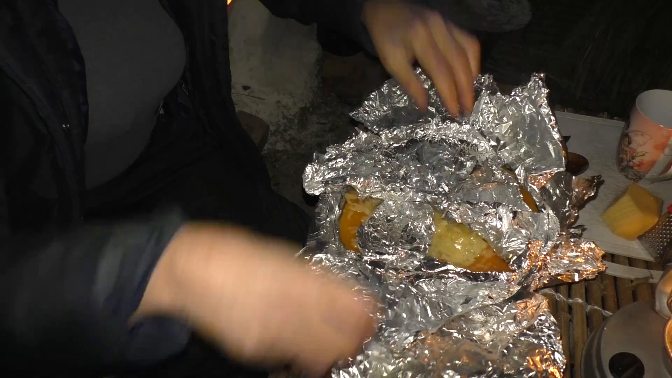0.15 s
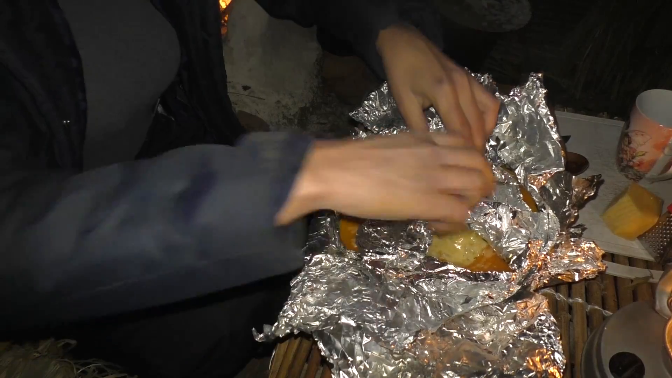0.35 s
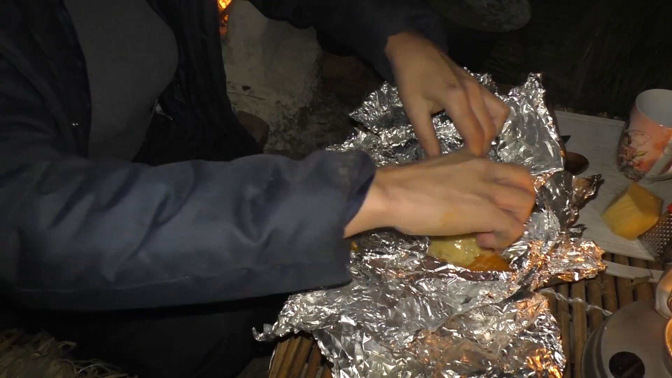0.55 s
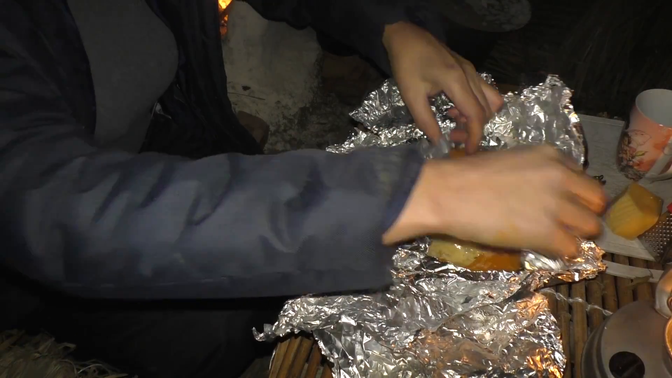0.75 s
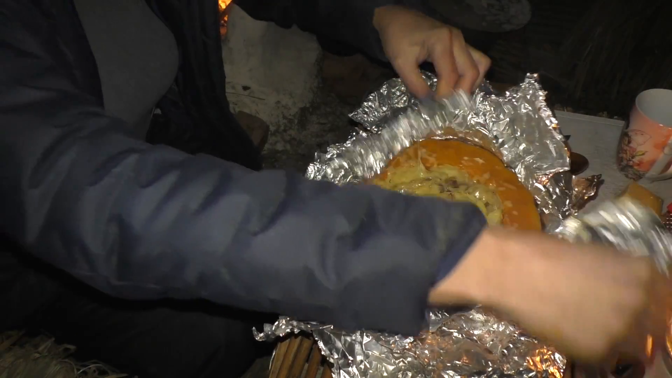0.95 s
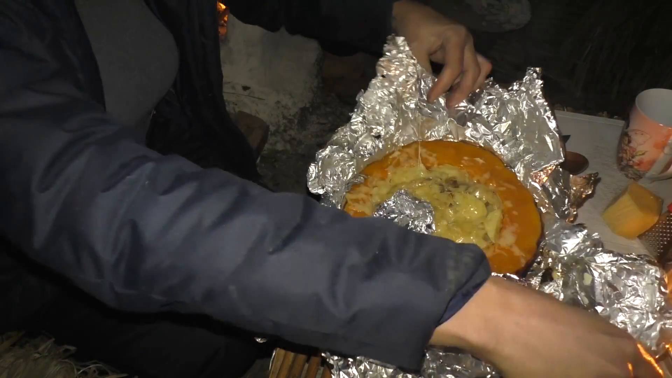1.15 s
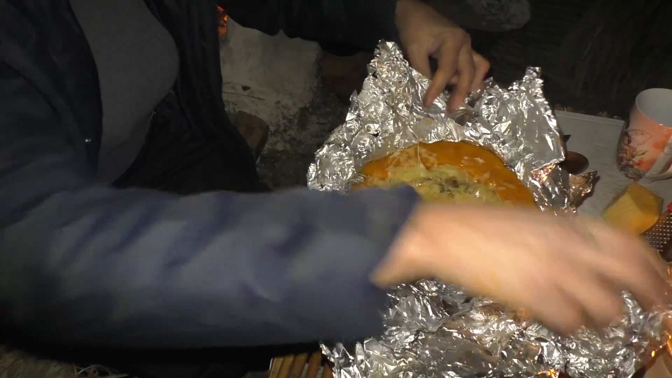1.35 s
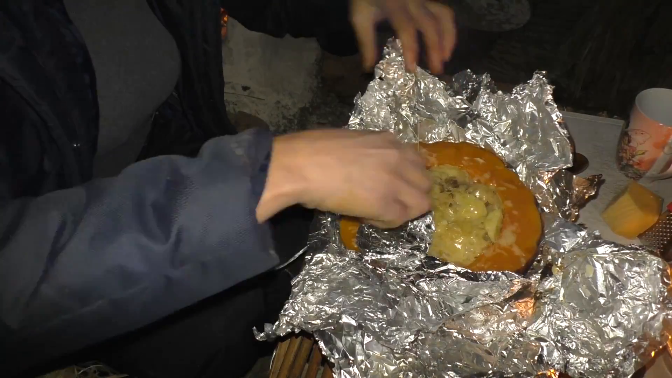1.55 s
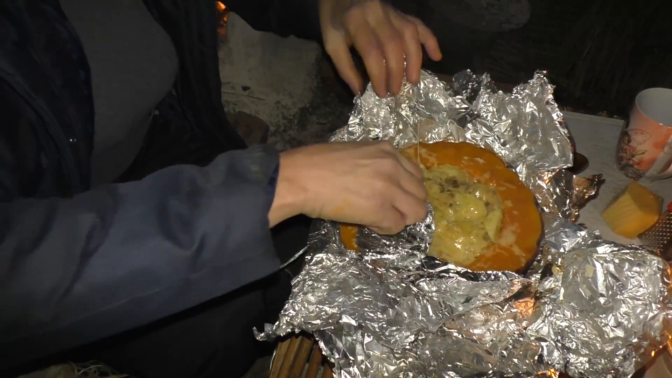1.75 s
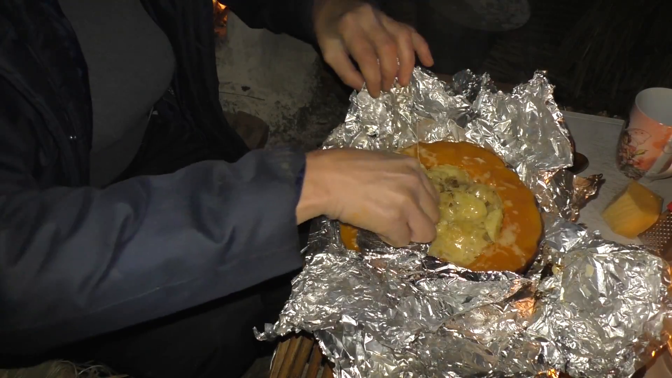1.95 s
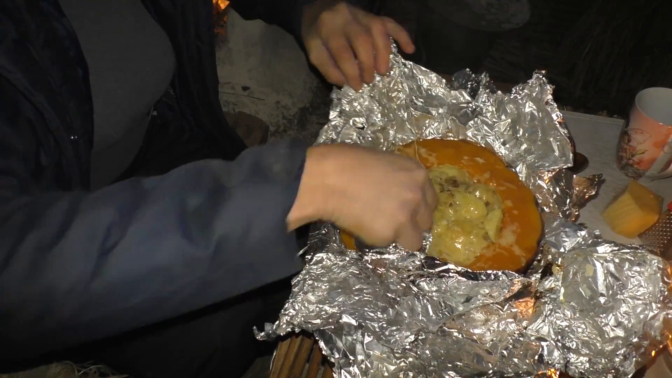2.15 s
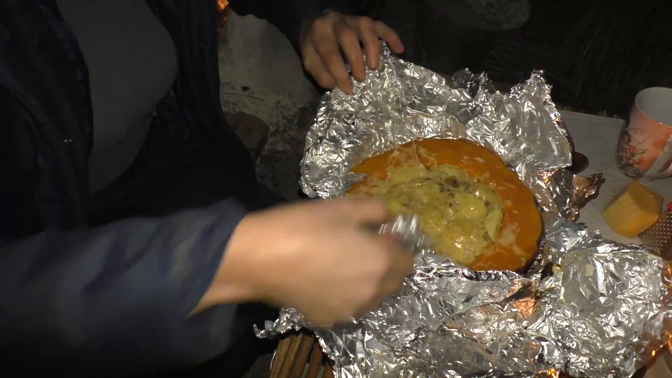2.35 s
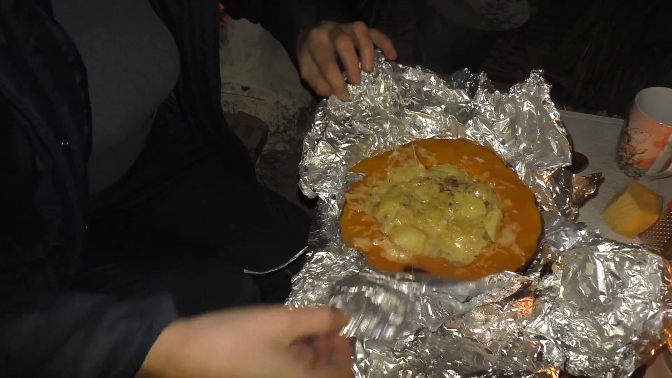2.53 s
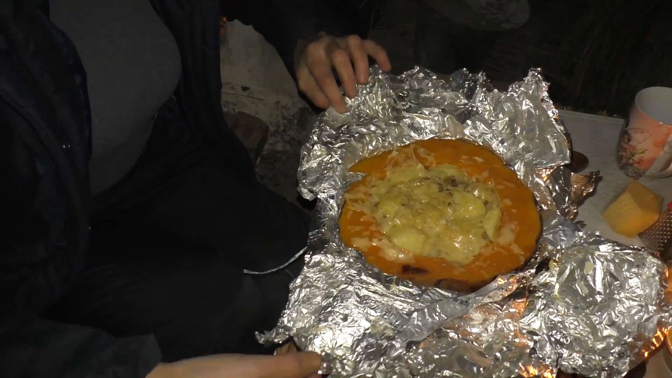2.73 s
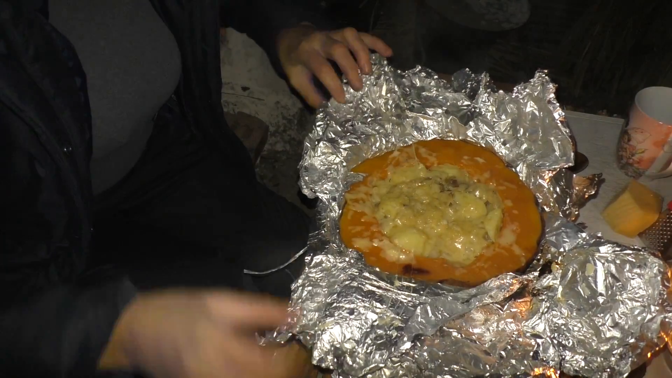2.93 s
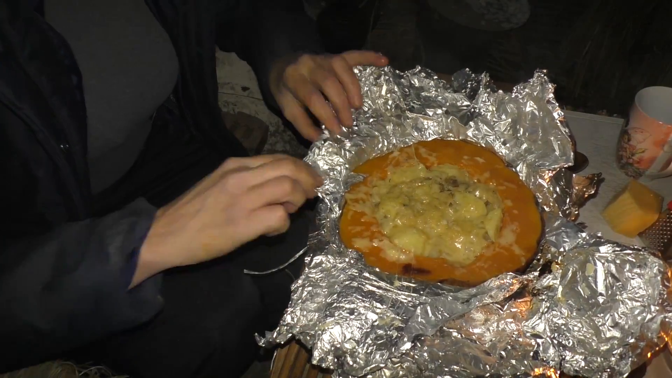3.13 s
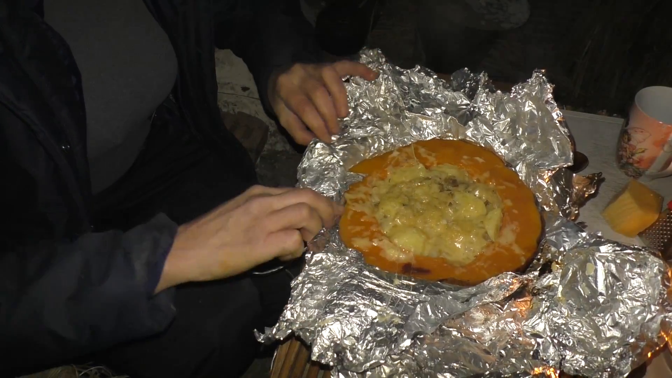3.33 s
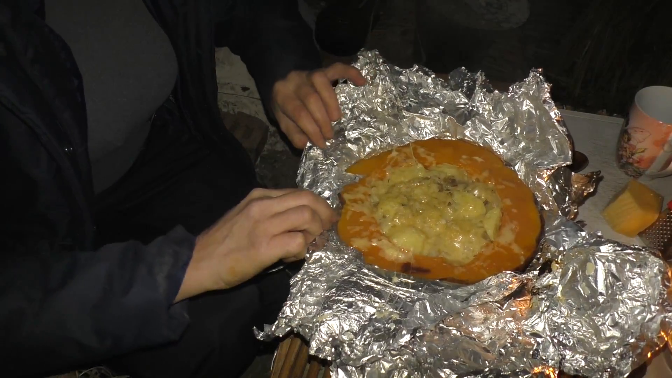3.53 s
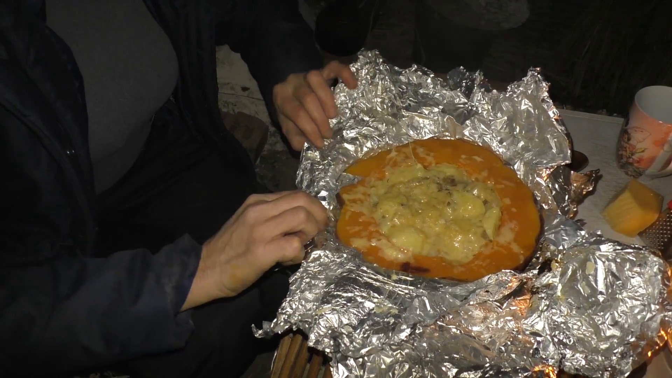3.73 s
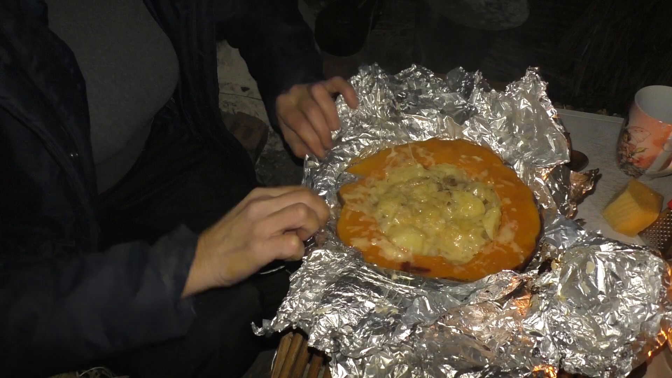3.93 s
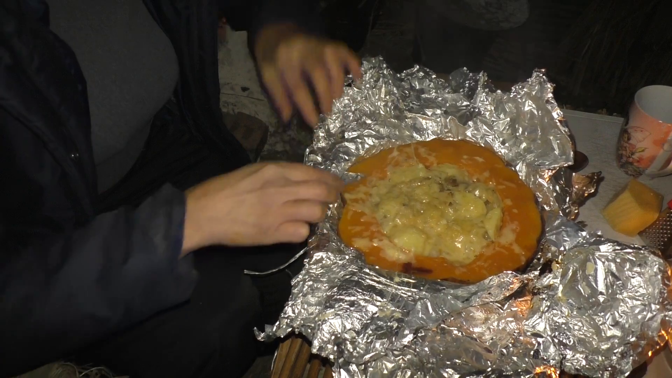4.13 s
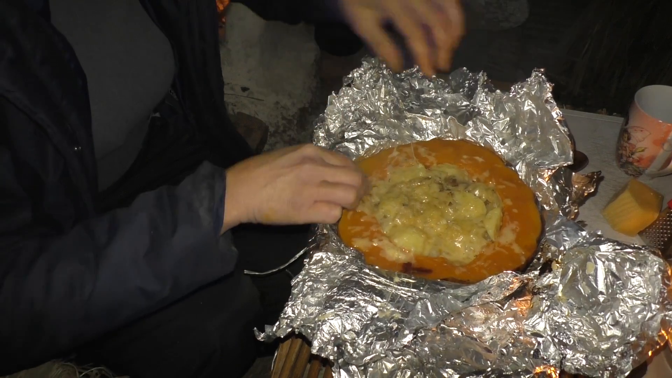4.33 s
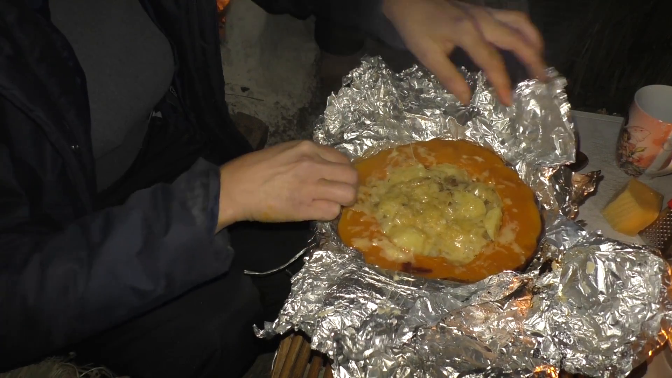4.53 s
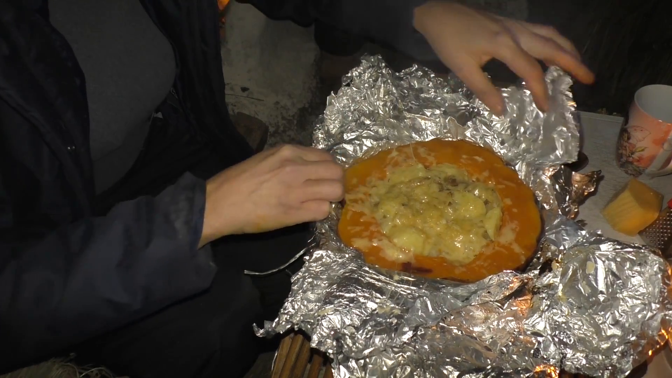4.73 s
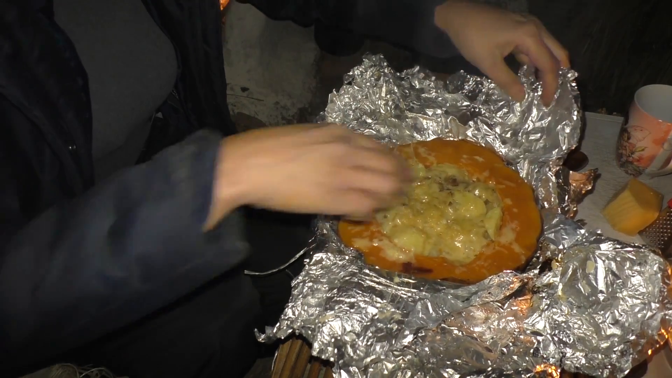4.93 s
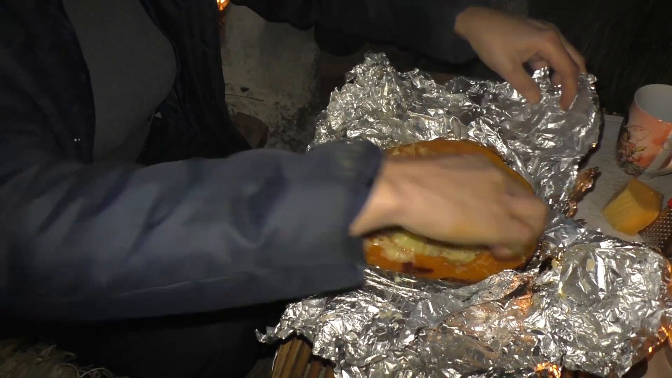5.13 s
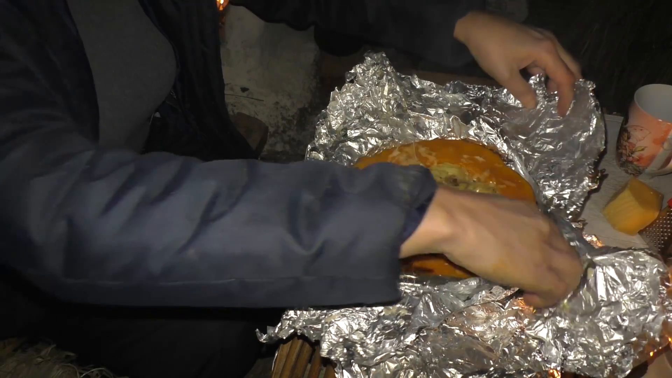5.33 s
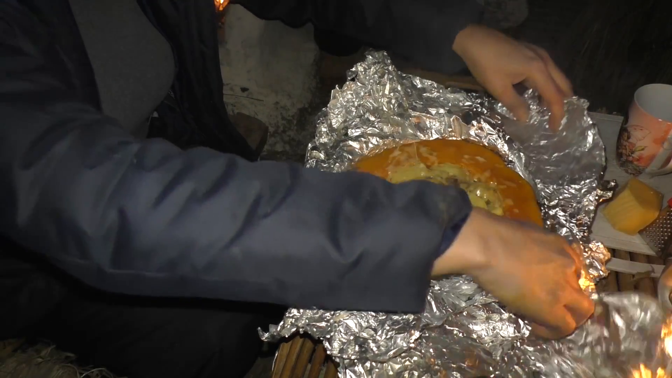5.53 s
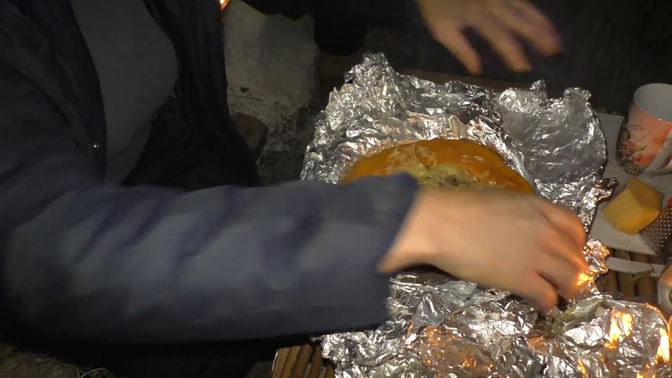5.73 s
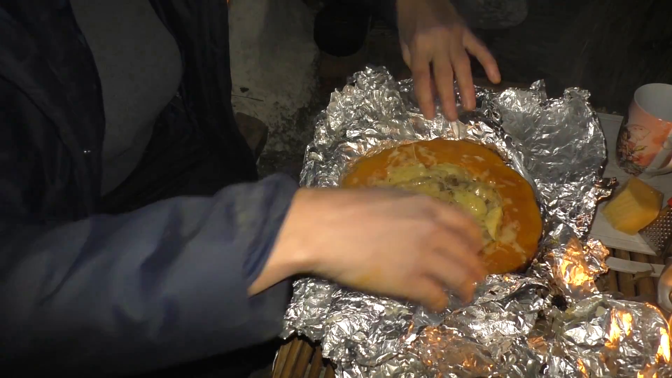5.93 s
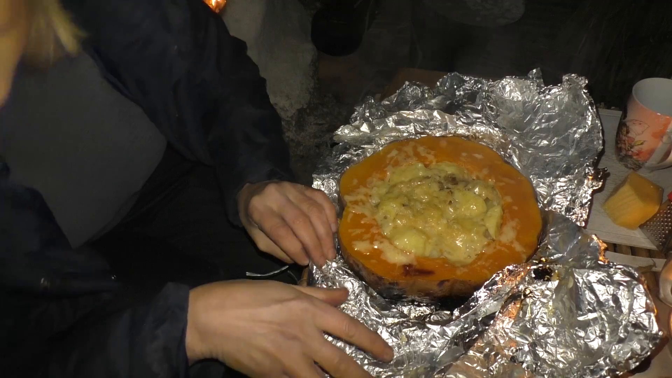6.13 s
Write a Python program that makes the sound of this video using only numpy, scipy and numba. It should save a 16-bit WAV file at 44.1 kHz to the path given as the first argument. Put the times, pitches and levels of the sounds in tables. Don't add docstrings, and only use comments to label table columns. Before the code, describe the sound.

Close stereo view of hands working on crumpled aluminium foil in a small sheltered corner. It opens mid-action with loud, bright crackling for about 0.2 s, then drops to thin rustle and scattered ticks. From about 0.9 to 1.3 s the sheet is pulled back in a dense, forceful burst of hard snaps and crinkling, with another heavy buckle near 1.6 s. A quiet gap follows until about 2.2 s, then crisp cracks and short rustles gather at 2.4 to 3.0 s. From 3.2 to 4.2 s come small, irregular folding crinkles and clear snaps; 4.2 to 5.2 s is sparser. A loud crunching flurry runs from 5.3 to 5.7 s, then light crackles to the end near 6.4 s. Soft low bumps from knuckles and sleeves recur. A brief diffuse tail, lumpy low rumble and faint hiss lie beneath.

```python
import sys
import numpy as np
from scipy import signal
from scipy.fft import rfft, irfft, next_fast_len
from scipy.io import wavfile
from scipy.ndimage import uniform_filter1d
from numba import njit

SR = 44100
rng = np.random.default_rng(int(sys.argv[2]) if len(sys.argv) > 2 else 0)


def int16_out(signal):
    q = np.round(np.clip(np.atleast_2d(signal).T, -1, 1) * 32767)
    wavfile.write(sys.argv[1], SR, q.astype(np.int16))


def magnitude_from_level(level_db):
    exponent = np.asarray(level_db, float) / 20
    return 10 ** exponent


N = 276948

# (frequency [Hz], density [dB per Hz])
AIR_SPECTRUM = [(25, -17.5), (118, -6.5), (480, -14.5), (600, -21.5), (850, -14), (1500, -19),
                (1900, -19.5), (4500, -50), (16000, -26)]
# (time [s], effort [dB], fine crackle share [dB], left minus right [dB])
HANDLING = [(0, -16.5, -2, -1), (.125, -28, -5.5, -1.5), (.265, -32.5, -10, -1), (.29, -46.5, -13, 2),
            (.52, -39, -12, -1.5), (.9, -26, -8, -2.5), (1.18, -23.5, -9, -3.5), (1.26, -24, -10.5, -2.5),
            (1.62, -47.5, -5.5, -1), (1.98, -44.5, -11.5, -0.5), (2.68, -26.5, -7, -1.5),
            (3.3, -30, -14, -0.5), (4.05, -31, -9, -1), (4.3, -37.5, -14.5, -0.5), (5.3, -28.5, -12, -2.5),
            (5.52, -18.5, -7, -2), (5.73, -19.5, -7, -2.5), (5.82, -42.5, -11, -1.5)]
# (time [s], length [s], depth [dB])
LULLS = [(0.7, .03, -4), (1.02, 0.071, -7.5), (1.407, 0.026, -9), (1.58, 0.023, -8), (2.89, 0.028, -12),
         (3.109, 0.14, -15), (3.283, 0.043, -15), (3.495, 0.023, -8), (3.78, 0.1, -6.5),
         (4.093, 0.021, -15), (4.775, 0.05, -10), (4.852, 0.034, -7), (5.453, 0.073, -2), (6, 0.044, -18)]
ZONES_HZ = (450, 2300, 10000)
# (frequency [Hz], gain [dB])
FOIL_RESPONSE = [(95, -18.5), (300, 5), (850, -2.5), (1060, 8), (1550, 7.5), (4000, 6), (5000, 2),
                 (6400, 1), (11500, 5), (14800, -2.5), (16000, -3)]
# (time [s], level [dB], pitch [Hz])
BUMPS = [(0.031, -37, 194), (0.342, -38, 124), (0.924, -34, 234), (1.069, -39, 207), (1.137, -34, 204),
         (1.181, -33, 229), (1.359, -39, 152), (1.584, -34, 216), (1.768, -43, 116), (1.85, -38, 113),
         (1.916, -40, 129), (2.429, -34, 178), (2.688, -41, 175), (2.92, -43, 214), (3.237, -42, 143),
         (4.594, -43, 121), (5.324, -39.5, 138), (5.522, -36.5, 213), (5.61, -36.5, 167), (5.665, -34, 151),
         (6.177, -43.5, 161),
         (1.586, -33.5, 115), (1.622, -43, 135)]
# (time [s], level [dB], treble [dB], loudest facet [Hz])
KINK_CRACKS = [(0.0435, -6.5, -8, 3140), (0.1014, -10, -1, 3320), (0.2353, -19, -8, 3700),
               (0.2484, -17, 8, 7840), (0.5599, -24, 7, 10030), (0.7671, -21, -6, 1680),
               (0.8191, -30, 9, 8010), (0.9067, -13, -7, 2150), (0.9761, -21, -2, 2410),
               (0.9941, -20, 0, 11930), (1.0331, -15, 4, 9390), (1.0543, -6, -16, 1460),
               (1.0593, -4, -9, 800), (1.0976, -7, -4, 4400), (1.165, -11, 9, 11760),
               (1.2021, -7, -5, 3400), (1.2444, -23, -10, 1890), (1.2662, -22, -9, 3060),
               (1.2985, -19, -1, 3320), (1.3464, -19, -8, 1720), (1.4067, -21, 5, 9950),
               (1.5862, -9, -16, 810), (2.0908, -19, 5, 15120), (2.2243, -7, 15, 12600),
               (2.2673, -23, -9, 3530), (2.3208, -22, 3, 10720), (2.3924, -20, -3, 1980),
               (2.464, -20, 5, 13520), (2.4939, -25, -2, 2070), (2.7111, -15, -2, 5210),
               (2.721, -27, -1, 2580), (2.7333, -10, 0, 2200), (4.6719, -17, 6, 8500),
               (2.8204, -16, 3, 8570), (2.8248, -15, 10, 11240), (2.8433, -23, 0, 1850),
               (2.8544, -16, -12, 1940), (2.8747, -22, -7, 1510), (2.9478, -7, -14, 1550),
               (3.0429, -25, -15, 3230), (3.0578, -17, 6, 9000), (3.2412, -20, -5, 3830),
               (3.325, -10, -1, 10210),
               (3.335, -18, -3, 2200), (3.3815, -17, -8, 1380), (3.4293, -18, 6, 10500),
               (3.449, -18, -5, 3060), (3.4999, -14, 3, 4500), (3.571, -23, -9, 1290),
               (3.585, -18, 0, 1240), (3.6172, -15, -14, 3700), (3.648, -26, -9, 2110),
               (3.8269, -20, 6, 11000), (3.6711, -21, 4, 10550), (3.6832, -24, -1, 3660),
               (3.6944, -20, 1, 1420), (3.833, -16, 2, 3040), (3.9541, -22, -3, 1550),
               (3.971, -7, -5, 3000), (3.9886, -14, 6, 9040), (4.029, -12.5, -1, 3500),
               (4.034, -24, -1, 3140), (4.0386, -23, -5, 1420), (4.071, -13, -2, 3750),
               (4.1087, -23, -6, 1340), (4.5813, -23, -16, 1460), (4.6334, -11.5, 0, 2370),
               (4.8067, -24, -9, 1340), (4.9525, -15, 8, 10160), (5.1219, -28, -10, 2800),
               (5.1415, -20, -7, 3570), (5.1878, -25, -12, 2410), (5.2112, -18.5, -8, 2360),
               (5.3175, -15, -9, 2760), (5.3498, -12, -13, 2430), (5.41, -18, -6, 2670),
               (5.4812, -12, 2, 9000), (5.4985, -7, -8, 2240), (5.5322, -12, 1, 1080),
               (5.543, -9, 3, 11760), (5.56, -5, -4, 4030), (5.6227, -4, -8, 2900), (5.649, -16, 4, 12700),
               (5.7086, -4.5, -5, 1420), (5.921, -25, -9, 1290), (6.094, -19, -6, 3640),
               (6.1022, -18, 10, 9690), (6.1715, -21, 11, 9690)]
# (time [s], level [dB], treble [dB], loudest facet [Hz])
CREASE_SNAPS = [(0.0704, -11.5, -6, 2040), (0.305, -31.5, -3.5, 1840), (0.4524, -40, 0, 1340),
                (0.5375, -17.5, -6.5, 2760), (0.664, -37, 8, 8220), (0.6901, -16.5, -9, 1240),
                (0.7726, -16, -12, 1890), (1.0592, -7.5, -11, 1234), (1.163, -16, 0, 12000),
                (1.3685, -11.5, -15, 1570), (1.4805, -14, -15, 1550), (1.5318, -15.5, -19, 2620),
                (1.5866, -12.5, -16.5, 1520), (2.0136, -40, -31, 1110), (2.0286, -27, -25, 1920),
                (2.2069, -25, -1, 11900), (2.3086, -37, -11, 1910), (2.5535, -19.5, -9, 1470),
                (2.6164, -8, -15, 1350), (2.7334, -15, -4.5, 9600), (2.743, -27, 7, 10800),
                (2.7704, -17, -15, 1930), (2.8522, -16, -16, 2040), (3.042, -18, -24, 3040),
                (3.0848, -22.5, -24, 1480),
                (3.188, -27.5, -1, 3060), (3.2956, -21.5, -9, 1180), (3.335, -16.5, -13, 2230),
              (3.3815, -17, -12, 1450), (3.572, -35, -15, 1930), (3.5845, -20, -6, 1170),
              (3.6466, -32, -17, 1470), (3.671, -22.5, -2, 10300), (3.786, -23, -10, 1860),
              (3.885, -19.5, -12, 1440), (3.944, -24.5, -1, 1470), (4.0378, -19, -8, 1350),
              (4.0685, -13, -7.5, 1930), (4.1168, -12.5, -12, 2500), (4.1522, -22, -7, 3180),
              (4.2267, -23, -5.5, 1910), (4.6724, -23, -1, 1500), (4.752, -28, 0, 11200),
              (5.1208, -39, -17, 2900), (5.1414, -33, -16, 2350), (5.2109, -17, -10, 2360),
              (5.348, -4, -16.5, 2370), (5.3583, -13, -4.5, 3250), (5.4806, -12, -7.5, 1470),
              (5.5064, -8, -17, 3160), (5.889, -27.5, -13, 1600), (5.921, -17.5, -21, 1200),
              (5.96, -18, -9, 9000), (6.1712, -22.5, 2.5, 9770), (6.177, -15.5, -6, 3820)]
# (time [s], level [dB], treble [dB], loudest facet [Hz], t60 [s])
BUCKLE_RUNS = [(0.1004, -17.5, -2.5, 2010, 0.074), (0.1652, -30, -2, 2930, 0.092),
               (0.2482, -23, -2.5, 7900, 0.085), (0.3889, -25, -12, 1180, 0.074),
               (0.885, -18.5, -5.5, 1710, 0.097), (0.9328, -14, -30, 1750, 0.071),
               (0.994, -20.5, -14, 2540, 0.072), (1.03, -18.5, -8, 1230, 0.072),
               (1.097, -16, -5.5, 2060, 0.099), (1.1474, -13, -5.5, 11950, 0.13),
               (1.183, -15, -0.5, 3300, 0.084), (1.244, -22, -30, 1820, 0.058),
               (1.3437, -14, -12.5, 3240, 0.084), (1.402, -21.5, -3.5, 11500, 0.094),
               (1.4949, -17, -12.5, 2080, 0.1), (1.905, -27, -17, 1370, 0.072),
               (1.9114, -25.5, -9, 2250, 0.075), (2.14, -26.5, -9, 2910, 0.1),
               (2.2673, -23, -11, 2210, 0.066), (2.319, -24.5, -4, 1910, 0.07),
               (2.4295, -14, -5.5, 1270, 0.049), (2.647, -17, -5.5, 8400, 0.096),
               (2.7062, -16.5, -11, 2700, 0.064), (2.8706, -16, -18, 1320, 0.054),
               (3.239, -14, -9, 3970, 0.069), (3.5346, -31, -4, 2040, 0.059), (3.702, -12, -12, 2010, 0.079),
             (3.7307, -17.5, -9, 1970, 0.076), (3.8329, -31, -8, 2970, 0.056),
             (3.916, -17.5, -15, 2920, 0.064), (3.9523, -19.5, -16, 3030, 0.069),
             (4.029, -17, -6, 1400, 0.073), (4.061, -20, -4, 2590, 0.05), (4.357, -21.5, -4.5, 2880, 0.062),
             (4.498, -27, -2, 1960, 0.061), (4.556, -26, -8.5, 2270, 0.078),
             (4.9137, -14.5, -11, 1300, 0.045), (4.952, -34, 6, 10200, 0.061),
             (4.9868, -16.5, -10.5, 3790, 0.094), (5.3258, -19, -5.5, 2560, 0.062),
             (5.4086, -16.5, -6.5, 2680, 0.075), (5.5556, -12, -5.5, 3860, 0.089),
             (5.65, -14.5, -12, 2120, 0.079), (4.133, -25, -3, 2000, 0.1),
             (6.0248, -21, -14.5, 1180, 0.079), (6.0933, -19, -11, 3740, 0.059),
             (6.156, -20.5, -10, 2970, 0.11), (6.264, -22, -10, 3200, 0.088),
               (0.05, -12, -13.5, 3300, .17), (0.78, -27, -7, 2800, .06), (4.7175, -21, -6.5, 1470, 0.16),
         (.915, -14.5, -24, 1900, .1), (0.92, -19, 0, 2400, 0.12), (0.64, -28, -7, 2700, 0.076),
         (1.2, -12.5, -33, 1930, 0.12), (3.8, -30, -9, 1800, 0.12), (4.345, -28, -10, 2500, 0.083),
         (4.595, -32, -4.5, 12000, 0.075), (2.355, -26, -6, 2840, 0.15), (5.24, -22.5, -10.5, 2900, .17),
         (3.121, -26, -16, 1410, 0.037), (6.121, -34, -16, 1950, 0.17), (6.22, -25.5, -15, 1730, 0.3)]
# (time [s], level [dB], main facet [Hz])
FLAPS = [(0.885, -29, 286), (0.926, -25, 234), (1.056, -27, 396), (1.162, -22, 293), (1.182, -23, 358),
         (1.37, -27, 302), (1.586, -26.5, 317), (2.324, -29, 315), (2.43, -23.5, 470), (2.613, -31, 463),
         (3.238, -25.5, 336), (3.338, -35, 377), (3.586, -38, 331), (3.916, -33, 440), (4.033, -28, 314),
         (4.069, -23.5, 371), (4.225, -33, 330), (4.355, -30, 517), (4.724, -27, 287), (4.81, -32, 390),
         (5.028, -28, 326), (5.343, -29, 310), (0.387, -34, 330), (5.669, -28, 288)]
# (time [s], level [dB], treble [dB], loudest facet [Hz])
TICKS = [(0.5594, -29.5, 1, 10150), (0.6459, -23.5, -4.5, 8100), (0.7273, -17.5, -10.5, 3320),
         (0.817, -42, 1, 7990), (2.0911, -32, -7, 10600), (2.107, -38, -1, 1520),
         (2.2246, -38.5, 18, 12600), (2.4096, -20, -6.5, 11900), (2.4635, -29, 4, 13500),
         (2.8249, -26.5, 9, 2900), (2.9472, -11.5, -13, 1520), (3.018, -15, -14, 1800),
         (3.058, -30, 3, 8470), (3.2254, -12.5, -7.5, 8100), (3.3241, -24.5, 0, 2310),
         (3.4294, -23.5, -3, 2030), (3.4993, -20, -2.5, 4470), (3.6172, -26, -10, 3940),
         (3.8272, -33, 0, 2970), (3.9712, -16, -8, 2740), (3.9886, -31, 2, 9150), (4.5812, -25, -29, 1350),
         (4.6334, -19, -4.5, 2400), (4.8124, -25, -4, 1240), (5.026, -15, -0.5, 9400),
         (5.0814, -29.5, 4.5, 2690), (5.108, -30, 2, 2630), (5.6209, -18, -23, 2800),
         (6.1, -31.5, 5.5, 9460), (6.1943, -15.5, -13, 1760)]
# (time [s], level [dB], pitch [Hz])
PINGS = [(3.1905, -22.5, 3220), (3.9712, -17, 3000), (4.0385, -24, 1450), (1.0595, -24, 720),
         (1.0592, -22, 1300), (1.5865, -28, 700), (2.617, -28, 720), (1.5885, -23, 1420)]

SNAP_T60_S = 0.03


def colour(x, table):
    hz, db = np.transpose(table)
    size = next_fast_len(N)
    bin_hz = np.maximum(np.arange(size // 2 + 1) * SR / size, 1)
    gain = magnitude_from_level(np.interp(np.log(bin_hz), np.log(hz), db))
    return irfft(rfft(x, size) * gain, size)[..., :N]


def walk(rate_hz):
    hold = int(SR / rate_hz)
    steps = np.repeat(rng.standard_normal(N // hold + 1), hold)
    return uniform_filter1d(steps, hold)[:N]


@njit
def add(out, start, pole, left, right, length, rise):
    for g in range(len(start)):
        z = 1 + 0j
        for i in range(min(length[g], out.shape[1] - start[g])):
            z *= pole[g]
            push = z * min(i / rise, 1.)
            out[0, start[g] + i] += (left[g] * push).imag
            out[1, start[g] + i] += (right[g] * push).imag


def damped_pole(hz, t60_s):
    return np.exp(2j * np.pi * hz / SR - np.log(1000) / (t60_s * SR))


def facets(s, hz, decay, place, phase, zone_db, db, cycles, shortest_s, rise_s, longest_s=.022):
    zone = np.interp(np.log(hz), np.log(ZONES_HZ), np.arange(3))
    tilt_db = sum(np.maximum(1 - abs(zone - k), 0) * zone_db[k] for k in range(3))
    t60_s = np.clip(cycles * (0.24 + 9.7 * decay ** 2) / hz, shortest_s, longest_s)
    equal_energy = np.sqrt(np.sqrt(hz / 16500) / (t60_s * SR))
    gain = magnitude_from_level(db + tilt_db) * equal_energy * np.exp(2j * np.pi * phase)
    pan_db = np.interp(s, *np.transpose(HANDLING)[[0, -1]])
    across = 2 * place - 1
    port = magnitude_from_level(pan_db / 2 + 3.17 * across) * np.exp(1.1j * (hz / 16500) ** 3 * across)
    out = np.zeros((2, N))
    add(out, (s * SR).astype(np.int64), damped_pole(hz, t60_s), gain * port, gain / port,
        (t60_s * SR).astype(np.int64), rise_s * SR)
    return out


def rings(table, t60_s, rise_s, lean_db):
    s, db, hz = np.transpose(table)
    gain = magnitude_from_level(db) * magnitude_from_level(60 * rise_s / t60_s) + 0j
    out = np.zeros((2, N))
    add(out, (s * SR).astype(np.int64), damped_pole(hz, t60_s), gain / magnitude_from_level(lean_db), gain * magnitude_from_level(lean_db),
        np.full(len(s), int(t60_s * SR)), rise_s * SR)
    return out


def snaps():
    tick_db, snap_db, run_db, flap_db = 1, -4, -4.5, -20.5
    tick_t60_s, flap_t60_s = .008, 0.0449
    bass_db, bright_db = -24.5, 7.5
    rows = [(s, db + tick_db, treble_db + bright_db, bass_db, tick_t60_s, hz)
            for s, db, treble_db, hz in TICKS]
    rows += [(s, db + snap_db, treble_db + bright_db, bass_db, SNAP_T60_S, hz)
             for s, db, treble_db, hz in CREASE_SNAPS]
    rows += [(s, db + run_db, treble_db + bright_db, bass_db, t60_s, hz)
             for s, db, treble_db, hz, t60_s in BUCKLE_RUNS]
    rows += [(s, db + flap_db, 0, 12, flap_t60_s, hz) for s, db, hz in FLAPS]
    return np.array(rows)


def effort(s):
    stir_offset_db, stir_t60_s, stir_per_run, stir_lead = -9, 0.12, 0.48, .7
    t = np.arange(0, N / SR, .002)
    at, db, treble_db, _, t60_s = snaps().T[:5, :, None]
    after = np.maximum(t - at, 0) / (stir_t60_s + stir_per_run * t60_s)
    before = np.maximum(at - t, 0) / (stir_lead * t60_s)
    size_db = 8 * np.log10(t60_s / SNAP_T60_S)
    stir_db = db + stir_offset_db + size_db - 60 * (after + before)
    times, bed_db, fine_db = np.transpose(HANDLING)[:3]
    lull_db = sum(depth_db * np.exp(-(2 * (t - lull_s) / length_s) ** 4)
                  for lull_s, length_s, depth_db in LULLS)
    bed_db = np.interp(t, times, bed_db) + lull_db
    fine_bed_db = bed_db + np.interp(t, times, fine_db)
    mid = magnitude_from_level(bed_db) ** 2 + np.sum(magnitude_from_level(stir_db) ** 2, axis=0)
    fine = magnitude_from_level(fine_bed_db) ** 2 + np.sum(magnitude_from_level(stir_db + treble_db - 5.0) ** 2, axis=0)
    return np.interp(s, t, 10 * np.log10(mid)), np.interp(s, t, 10 * np.log10(fine))


def air(lean_db=1.5):
    level_db, whine_hz, whine_width_hz, whine_db = -44.5 - 3.5, 1470, 120, 6
    mid, side = colour(rng.standard_normal((2, N)), AIR_SPECTRUM)
    rumble_band = signal.butter(2, [70, 260], "band", fs=SR, output="sos")
    lumps = magnitude_from_level(3 * walk(25))
    mid = mid + (lumps - 1) * signal.sosfiltfilt(rumble_band, mid)
    whine = signal.lfilter(*signal.iirpeak(whine_hz, whine_hz / whine_width_hz, SR), mid)
    mid = mid + magnitude_from_level(whine_db) * whine
    side = side + 0.82 * signal.hilbert(mid).imag
    low_side = signal.sosfiltfilt(signal.butter(1, 300, fs=SR, output="sos"), side)
    side = 0.14 * side + 0.5 * low_side
    pair = np.array([(mid + side) / magnitude_from_level(lean_db), (mid - side) * magnitude_from_level(lean_db)])
    return pair * magnitude_from_level(level_db) / np.sqrt(np.mean(mid ** 2))


def rustle():
    creases, flapping_db = 60000, -23.5
    pitch, decay, place, when, size, phase = rng.random((creases, 6)).T
    s = when * (N - 1) / SR
    hz = 110 + 16500 * pitch ** 1.7
    mid_db, fine_db = effort(s)
    zone_db = (mid_db + flapping_db + 19.5, mid_db, fine_db + 5.5)
    flurry_db = (1.1 * walk(25) + 1.1 * walk(70))[(s * SR).astype(int)]
    size_db = -1.8 * np.log(1 - size)
    return facets(s, hz, decay, place, phase, zone_db, 15 + flurry_db + size_db,
                  cycles=37.0, shortest_s=0.0037, rise_s=0.000064)


def bumps():
    return magnitude_from_level(-2.5) * rings(BUMPS, t60_s=0.092, rise_s=0.007, lean_db=4)


def strays():
    count, level_db, spread_db = 900, -4, 2.5
    when, size, tint, pitch = rng.random((count, 4)).T
    s = when * (N / SR - .01)
    mid_db, fine_db = effort(s)
    treble_db = fine_db - mid_db + 2.0 + 16 * (tint - .5)
    hz = np.where(treble_db > 0, 8000 + 7000 * pitch, 1100 + 3400 * pitch)
    db = mid_db + level_db - spread_db * np.log(1 - size)
    return np.transpose([s, db, treble_db, hz])


def cracks():
    count, crack_db, spread = 28, 10, 0.31
    table = np.vstack([KINK_CRACKS, strays()])
    s, db, treble_db, ping_hz = np.repeat(table, count, axis=0).T
    pitch, decay, place, delay, _, phase, kind = rng.random((len(s), 7)).T
    place = np.repeat(place[::count], count)
    near = kind < .4
    phase = np.where(near, phase, .2 + .1 * phase)
    near_hz = np.minimum(ping_hz * (1 + spread * (pitch - .5)), 16000)
    hz = np.where(near, near_hz, 450 + 15500 * pitch ** 1.508)
    loud_db = db + crack_db - np.maximum(treble_db, 0)
    zone_db = (0 * s - 12, 0 * s, treble_db - 3)
    return facets(s + .0004 * delay * near, hz, decay, place, phase, zone_db, loud_db,
                  cycles=4.5, shortest_s=.002, rise_s=.00005)


def buckles():
    facets_each = 260
    s, mid_db, treble_db, bass_db, t60_s, ping_hz = np.repeat(snaps(), facets_each, axis=0).T
    pitch, decay, place, order, size, phase, kind = rng.random((len(s), 7)).T
    sings = kind < .03
    hz = np.where(sings, ping_hz * (0.982 + 0.046 * pitch), 90 + 16500 * pitch ** 2)
    t60_s = np.clip(t60_s, .005, .17)
    way = order ** 1.8
    swell = np.clip((t60_s / .1) ** 2, 0, 1)
    fade_db = -(1 - swell) * 24 * way - swell * 50 * (way - .3) ** 2
    area_db = 5 * np.log10(t60_s / 0.043)
    size_db = -0.79 * np.log(1 - size)
    db = mid_db + 12.5 + area_db + 8 * sings + fade_db + size_db
    late_s = (.4 - .15 * swell) * t60_s * way
    zone_db = (bass_db + 19.5, 0 * s, treble_db - 0.5)
    return facets(s + late_s - .0002, hz, decay, place, phase, zone_db, db,
                  cycles=49, shortest_s=0.001, rise_s=0.00022, longest_s=np.minimum(t60_s, .022))


def pings():
    return rings(PINGS, t60_s=0.027, rise_s=0.0013, lean_db=2.5)


def corner(x, t60_s=0.13, wet_db=-14):
    t = np.arange(int(.2 * SR)) / SR
    tail = rng.standard_normal((2, len(t))) * magnitude_from_level(-60 * t / t60_s) * (t > .002)
    tail = tail / np.sqrt(np.sum(tail ** 2) / 2)
    return x + magnitude_from_level(wet_db) * signal.fftconvolve(x, tail, axes=1)[:, :N]


def scene():
    foil = colour(rustle() + cracks() + buckles(), FOIL_RESPONSE)
    return air() + corner(foil + bumps() + pings())


def low_pass(x):
    return signal.sosfilt(signal.butter(12, 17050, fs=SR, output="sos"), x)


def record(dry):
    top_cut = signal.ellip(10, .2, 45, 15950, fs=SR, output="sos")
    mix = signal.sosfilt(top_cut, dry)
    return low_pass(mix)


dry = scene()
out = record(dry)
int16_out(out)
```